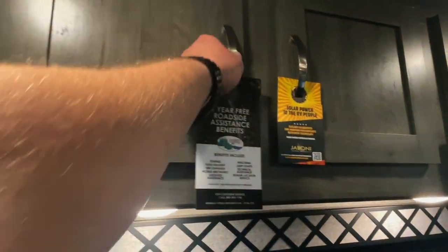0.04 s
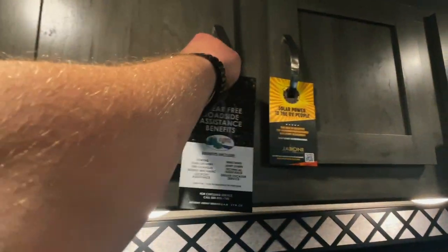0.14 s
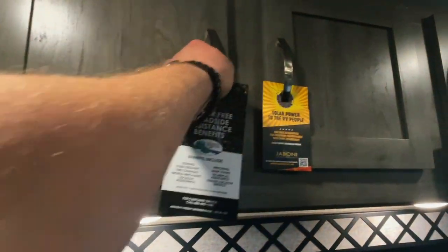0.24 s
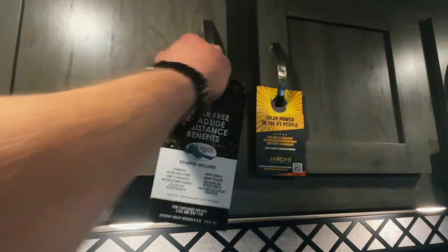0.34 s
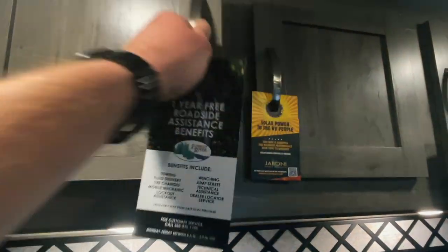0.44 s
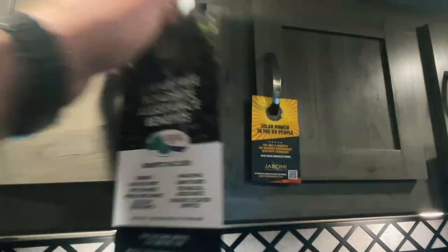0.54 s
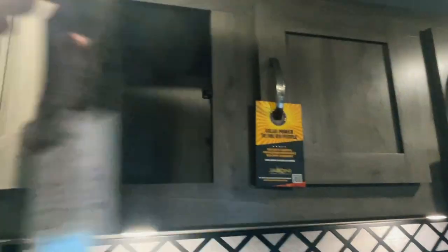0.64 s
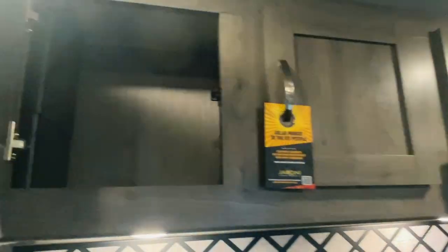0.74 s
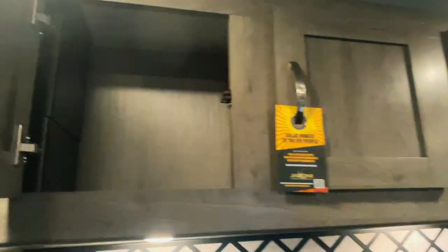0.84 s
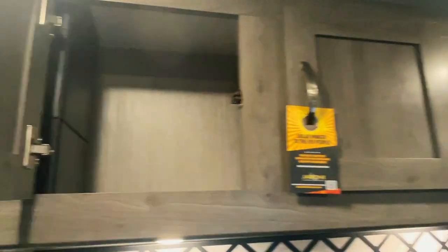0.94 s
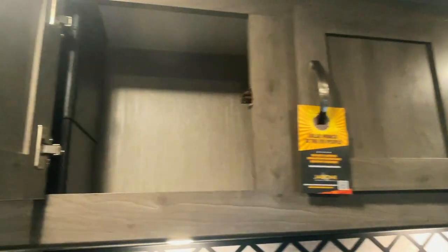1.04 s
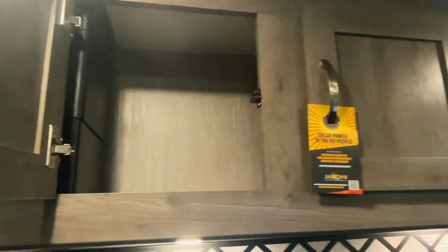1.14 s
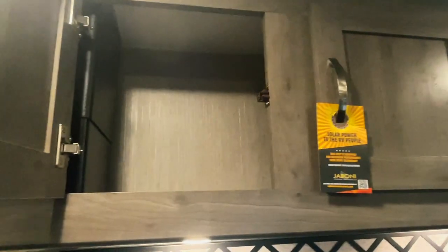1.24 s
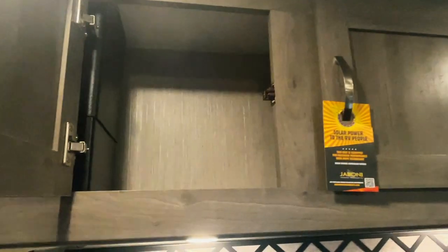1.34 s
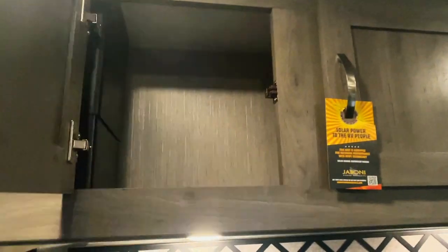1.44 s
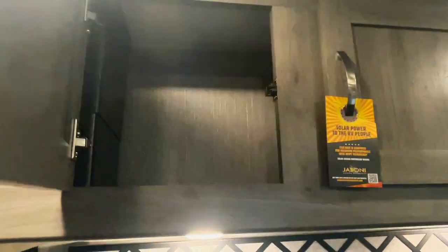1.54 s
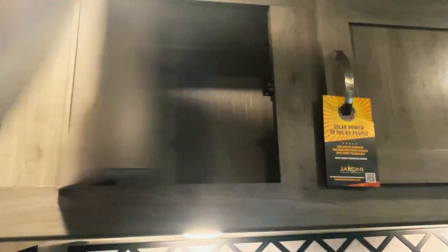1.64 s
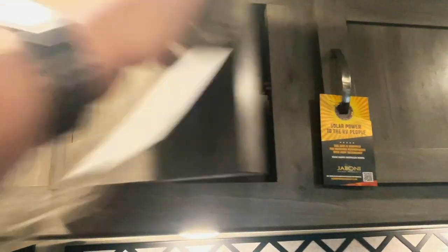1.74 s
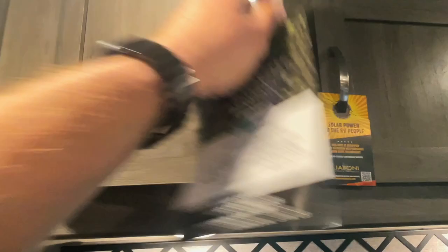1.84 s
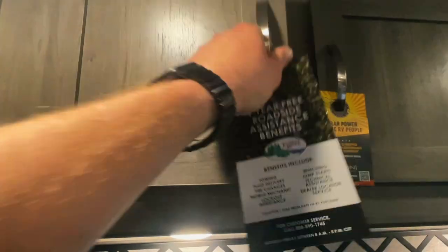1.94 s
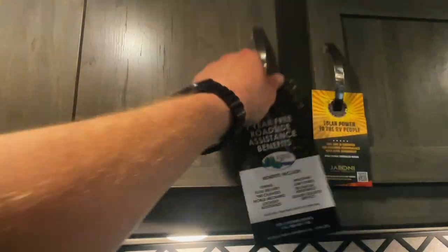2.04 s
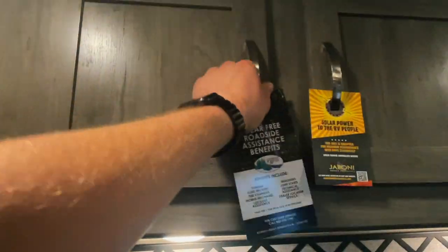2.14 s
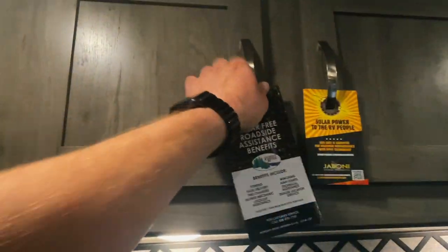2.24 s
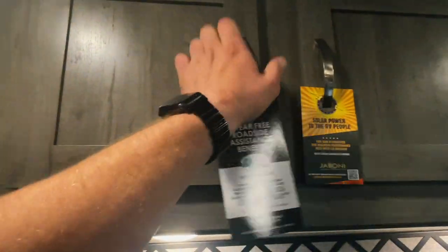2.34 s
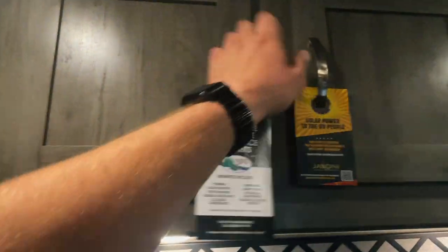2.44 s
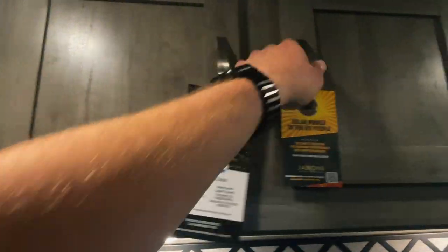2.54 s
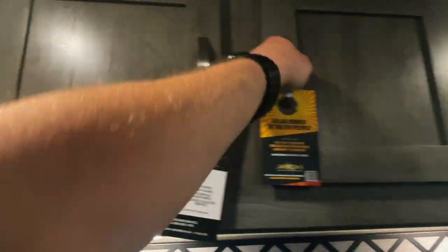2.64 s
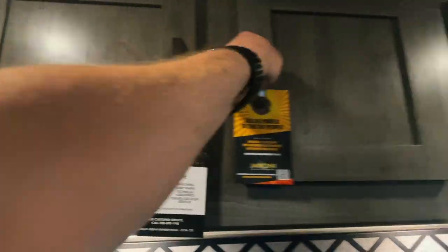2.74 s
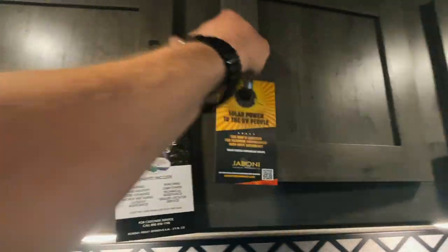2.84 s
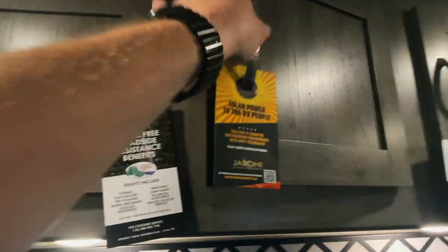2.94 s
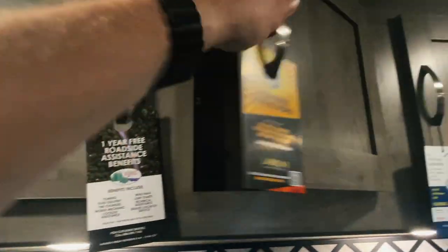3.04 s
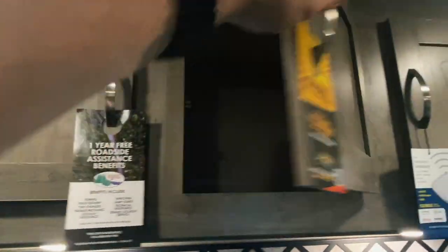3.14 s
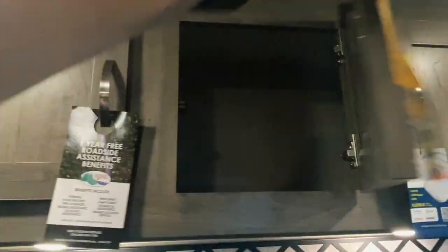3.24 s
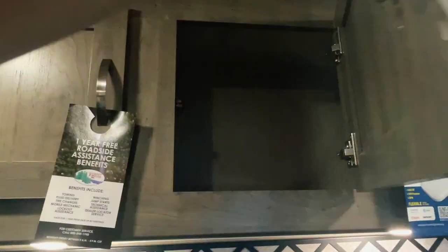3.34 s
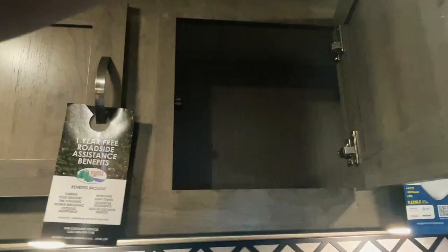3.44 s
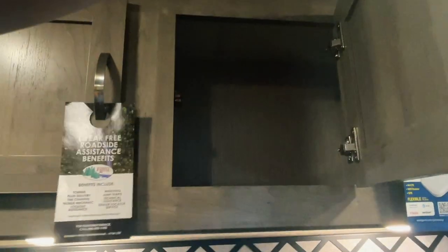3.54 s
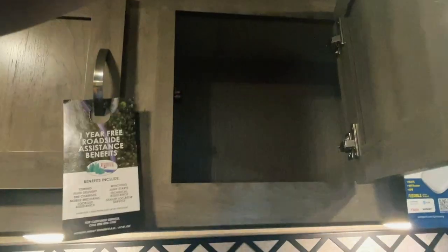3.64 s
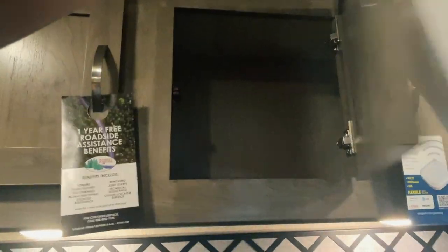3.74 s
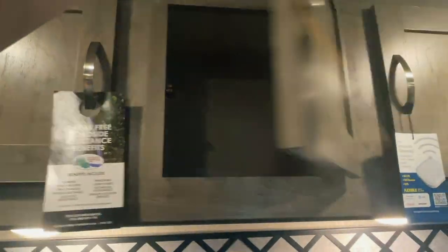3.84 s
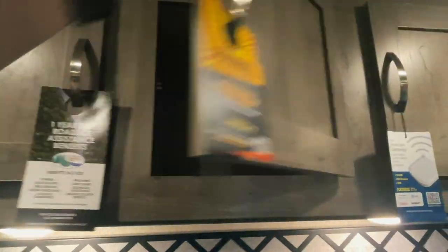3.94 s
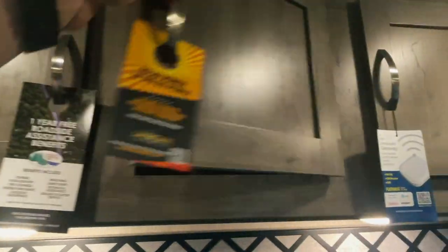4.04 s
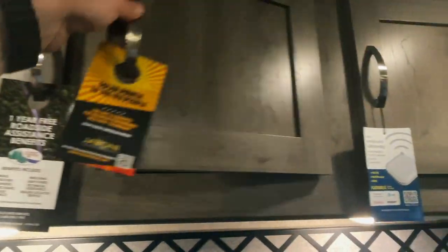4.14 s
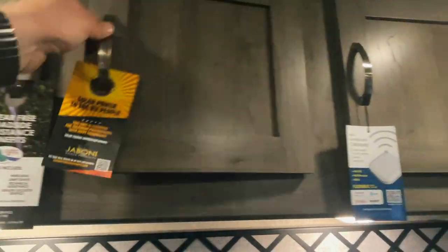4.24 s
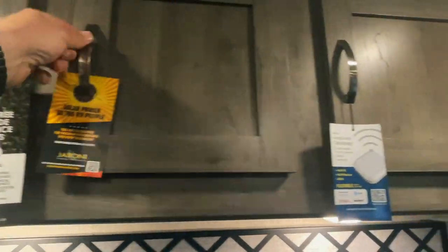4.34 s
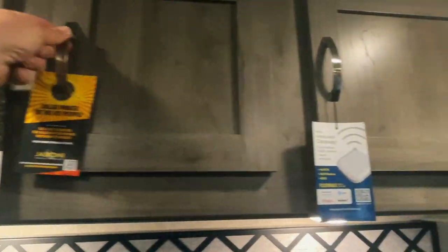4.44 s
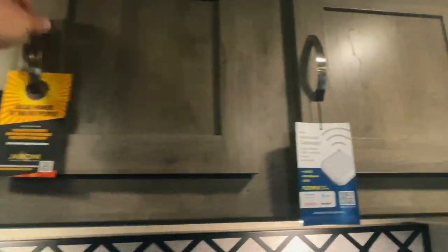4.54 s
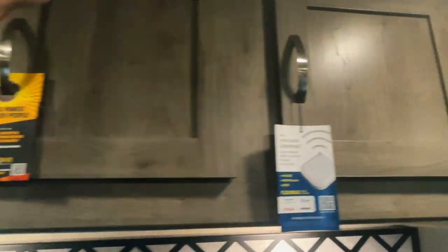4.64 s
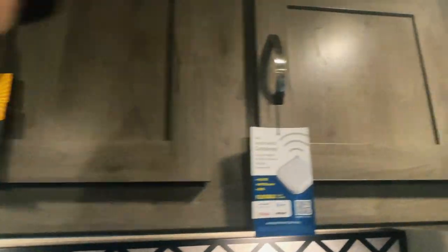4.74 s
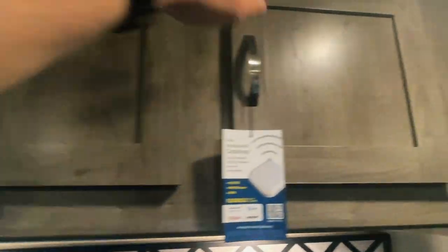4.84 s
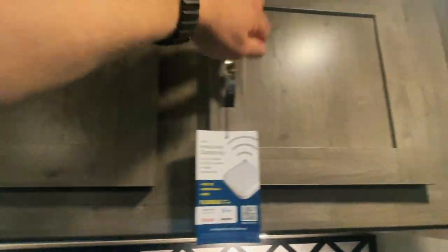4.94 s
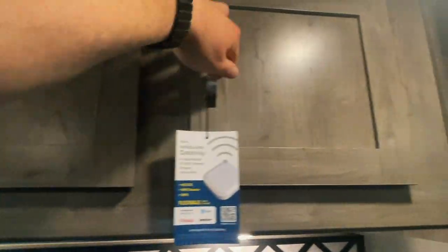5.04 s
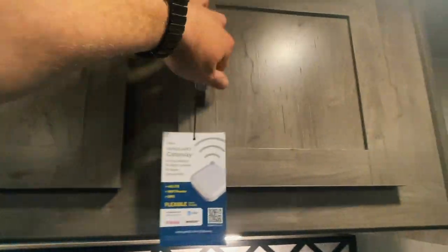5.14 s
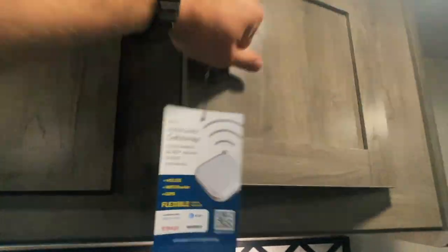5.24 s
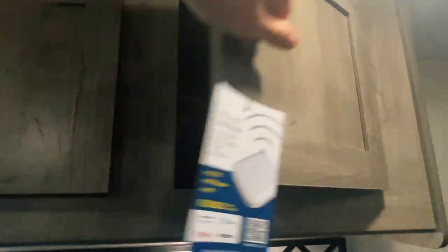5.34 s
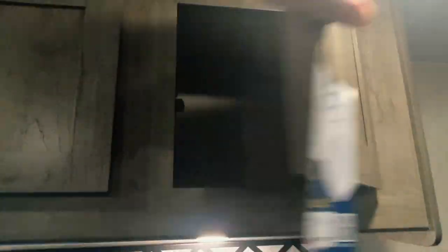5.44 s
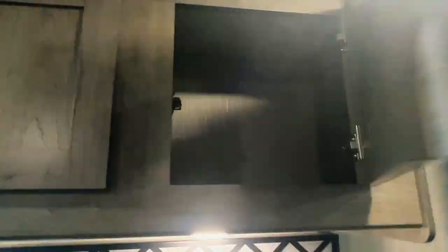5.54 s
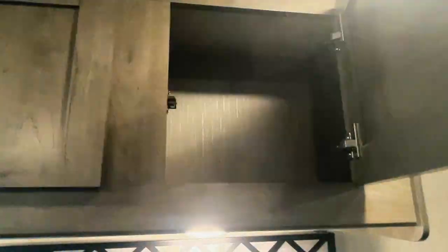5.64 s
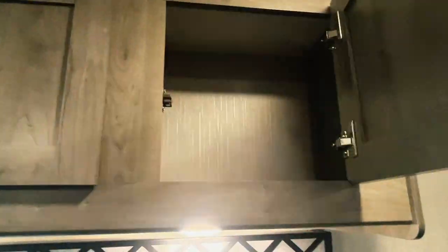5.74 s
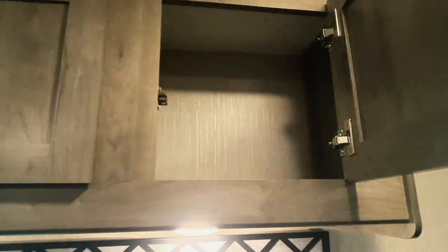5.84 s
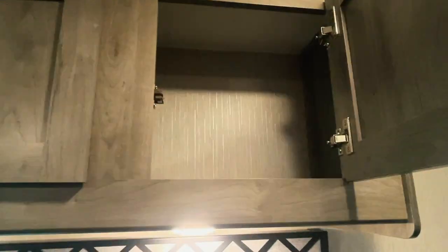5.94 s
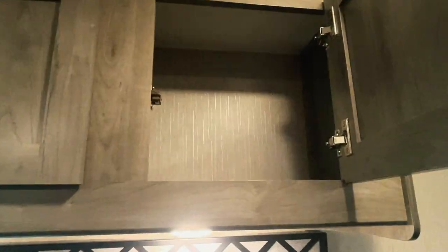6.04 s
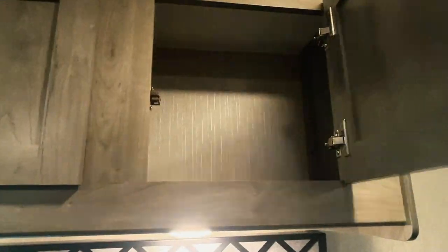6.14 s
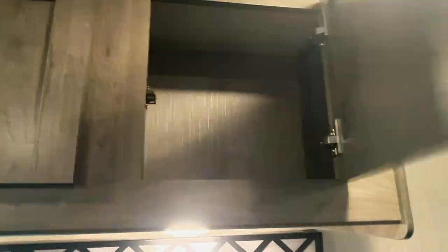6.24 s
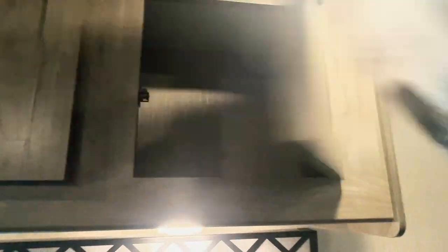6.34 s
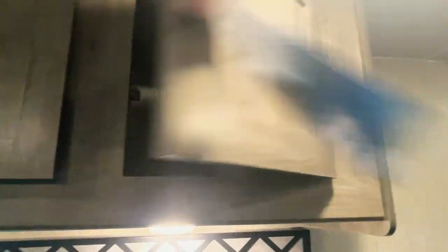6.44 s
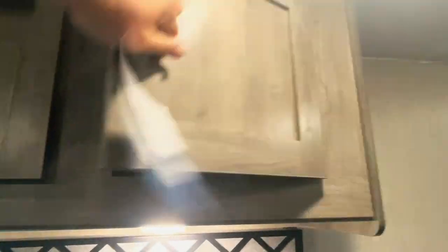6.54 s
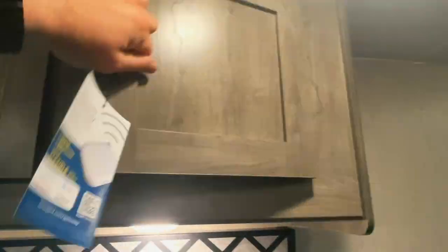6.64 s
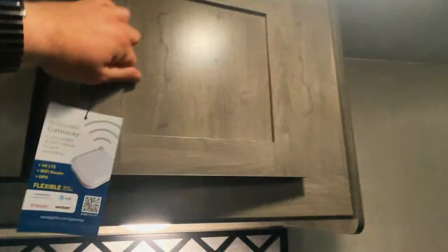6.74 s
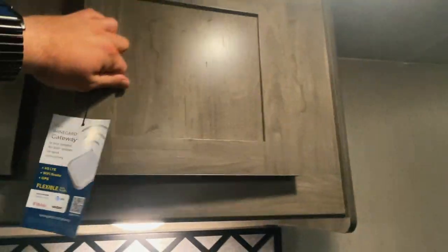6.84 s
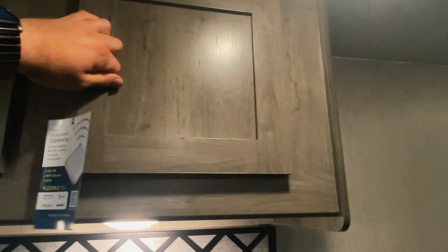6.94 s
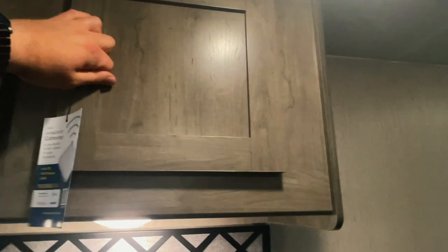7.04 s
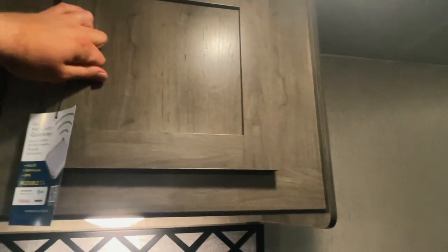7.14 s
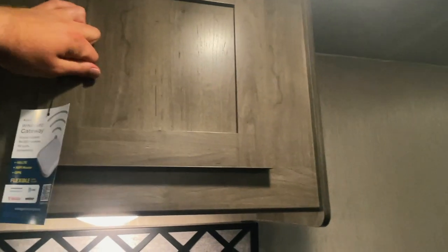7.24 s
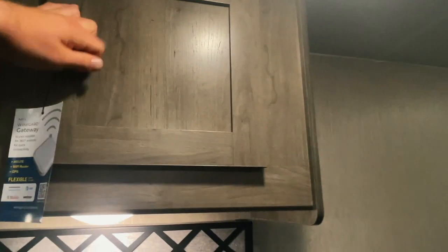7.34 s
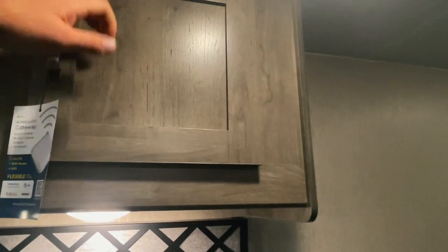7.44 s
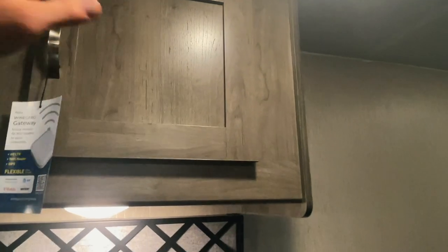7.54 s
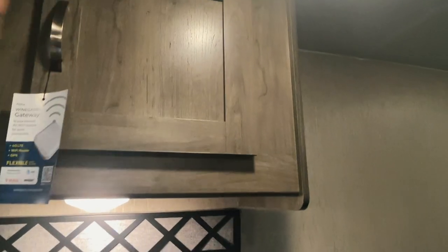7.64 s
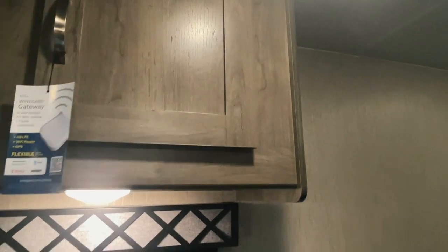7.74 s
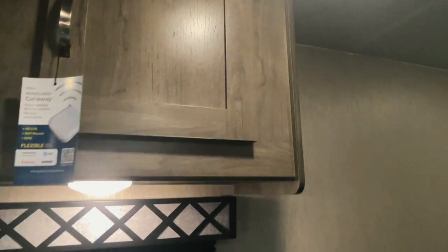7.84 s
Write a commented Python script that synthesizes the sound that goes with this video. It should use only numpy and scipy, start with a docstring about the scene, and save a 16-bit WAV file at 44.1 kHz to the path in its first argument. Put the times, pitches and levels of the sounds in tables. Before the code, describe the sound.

Close stereo recording in a small camper. A wooden cupboard door snaps off its spring catch, pauses, then claps shut. Two more doors follow the same way, each with a hollow knock and short boxy ring. Between them are soft hand bumps, card flicks, hinge ticks, light rubbing and sleeve swishes over faint low rumble.

```python
"""In a small camper, three overhead wooden cabinet doors are pulled open and pushed shut, one after another.
Opening, a door strains against its spring catch and snaps free; closing, it hits the catch and slams on the frame.
Hands bump the doors, hinges tick, cards flick and things rub: blows and clicks are ringing sines plus shaped
noise, rubs are noise through one resonance. Low rumble, still air and the swish of the arm are coloured noise."""
import sys
import numpy as np
from scipy import signal
from scipy.fft import rfft, irfft
from scipy.io import wavfile

SR = 44100
rng = np.random.default_rng(int(sys.argv[2]) if len(sys.argv) > 2 else 0)


def inscribe(sig):
    """Save sig as 16-bit PCM at rate SR to the path in sys.argv[1].

    A 1-D sig is mono; a 2-D sig holds one channel per row.
    Samples are clipped to [-1, 1] before scaling.
    """
    pcm = np.round(np.clip(np.atleast_2d(sig).T, -1, 1) * 32767)
    wavfile.write(sys.argv[1], SR, pcm.astype(np.int16))


N = 348390

# All levels in the tables are relative: the functions add their own balance.
# Background colours: rumble, stirred air, swish of sleeve and cards. Columns: f/Hz, level per Hz/dB
RUMBLE_COLOUR = [(15, -15.5), (30, -11), (55, 3.5), (80, -1.5), (130, -13.5), (200, -23), (400, -73.5)]
AIR_COLOUR = [(70, -30.5), (170, -3.5), (330, -7), (550, -10), (900, -10), (1400, -15.5), (2500, -19),
              (6000, -51.5)]
SWISH_COLOUR = [(700, -46), (1500, 2.5), (2200, -1), (3500, 3), (6000, 2.5), (8000, -6.5), (11000, -9.5),
                (16000, -55.5)]
# How loud the low rumble is over time. Columns: t/s, level/dB
RUMBLE_LEVEL = [(0, -39), (.6, -50.5), (1.1, -47), (2.3, -48.5), (2.9, -42.5), (4.4, -44), (5.8, -55),
                (6.2, -49), (7.9, -48.5)]
# Arm movements that swell and fade. Columns: t when fastest/s, half-length/s, air level/dB, swish level/dB
ARM_MOVES = [(0.033, 0.16, -43, -53.5), (0.516, 0.28, -51.5, -63), (1.293, 0.046, -60, -66.5),
             (1.94, 0.34, -48.5, -60), (2.99, 0.4, -46.5, -53), (3.528, 0.16, -46.5, -50.5),
             (3.836, 0.18, -49, -65), (4.42, 0.42, -49, -61), (5.32, 0.14, -51, -56.5),
             (6.18, 0.13, -74, -61), (7.266, 0.098, -47, -52), (7.703, 0.58, -55.5, -60)]
# Fingers and cards rub on a handle, or a hinge creaks.
# Columns: t at the middle/s, length/s, resonance f/Hz, width/Hz, level/dB
RUBS = [(0.06, 0.13, 686, 895, -46.5), (2.47, .13, 2130, 220, -52), (2.948, 0.068, 2130, 350, -49),
        (3.096, 0.12, 4900, 3030, -48), (3.306, 0.092, 2420, 4200, -46.5), (3.312, .11, 580, 500, -47),
        (3.571, 0.064, 2220, 1300, -46), (4.417, .11, 720, 505, -50), (4.662, 0.38, 1125, 110, -54.5),
        (4.678, .31, 3590, 250, -64.5), (4.861, .06, 475, 450, -41), (4.998, 0.045, 1270, 400, -31.5),
        (5.187, .03, 3480, 500, -46), (5.196, 0.056, 690, 710, -42.5), (6.634, .02, 1270, 700, -36),
        (6.775, .1, 520, 500, -31), (7.22, .08, 370, 450, -35.5)]
# A hanging card flicks against its door. Columns: t/s, level/dB
CARD_FLICKS = [(.077, -19), (.204, -5.5), (.368, -22.5), (.588, -23), (2.143, -13), (2.1827, -8.5),
               (2.907, -7), (3.779, -21), (4.095, -23), (5.528, -21)]
# A hinge or loose catch ticks as its door moves. Columns: t/s, level/dB, brightness/dB
HINGE_TICKS = [(1.5535, -21, 9.5), (1.557, -22.5, 7), (2.420, -15, -25), (2.574, -19, -17),
               (3.560, -16, -15.5), (3.941, -17.5, -1.5), (5.395, -17, -14), (6.267, -25.5, -19),
               (6.333, -31, 1.5), (6.551, -11.5, -3), (6.625, -9, -8), (6.81, -14, -8)]
# The middle door's handle rings when knocked. Columns: t/s, level/dB
HANDLE_KNOCKS = [(2.421, -40.5), (2.636, -32)]
# Notes of that handle. Columns: f/Hz, level/dB, time to fall 60 dB/s
HANDLE_NOTES = [(2000, -5, .2), (2050, 3.5, 0.23), (2120, -5.5, 0.19), (2270, -8, 0.14)]
# A hand bumps a door or its handle. Columns: t/s, door (0 left, 1 middle, 2 right), thump level/dB,
# wood level/dB, edge level/dB, build-up/s, after-ring level/dB
BUMPS = [(2.420, 1, -14, -14, -16.5, .001, 17), (2.576, 1, -23, -24, -37, .0013, -6),
         (2.820, 1, -20, -30.5, -31, 0.0033, 18), (4.829, 2, -12, -41, -32, 0.002, -14),
         (4.852, 2, -13, -17.5, -33.5, .002, 11), (6.268, 2, -32, -30.5, -36.5, 0.00051, -15),
         (6.612, 2, -22, -25.5, -39, 0.0045, -4), (7.214, 2, -11.5, -18, -48, .015, 7)]
# A door is pulled open. Columns: t when the catch lets go/s, door, pull knock level/dB, wood level/dB,
# panel f/Hz, panel swing level/dB, snap level/dB, after-ring level/dB
OPENINGS = [(.139, 0, -13, -6, 96, -14, 6.5, -2), (2.635, 1, -2, -1, 70.4, -6, 1, -1),
            (5.004, 2, -8, 2.5, 93, -4, 3, 1)]
# A door is pushed shut. Columns: t when it meets the catch/s, door, travel on to the frame/s, panel f/Hz,
# panel swing level/dB, then levels/dB of: thump on the catch, ping on the catch, thump of the slam,
# wood of the slam, edge of the slam, ping at the slam, after-ring
CLOSINGS = [(1.9349, 0, 0.026, 155.5, -2, -13, -6, 3.5, 5, -9, -35, -0.5),
            (4.154, 1, .059, 166, -7.5, 2, -6.5, 2, -2.5, 2, -4, 10),
            (6.726, 2, .112, 95.8, -6, 1, -20.5, 0.5, 5, -4, -13, 6.5)]
# Notes each door rings with, one list per door.
# Columns: f/Hz, level struck at the handle/dB, level struck at the frame/dB, time to fall 60 dB/s
DOOR_NOTES = [
    [(59.75, -17, -36, 0.87), (105.2, -25, -7, 0.28), (156.3, -13, -23, 0.3), (184, -14, -33, 0.34),
     (248, -30, -32, 0.1), (306, -24, -30.5, 0.19), (327.5, -23, -12.5, 0.22), (418.6, -19, -21.5, 0.26),
     (529.3, -18, -20.5, 0.26), (616, -34, -21, 0.3), (715, -16, -18, 0.14), (844, -11, -28, 0.19),
     (1325, -21, -13, 0.1), (1670, -12, -27, 0.1), (2120, -40, -13.5, 0.09), (2474, -24, -32, 0.13),
     (2640, -11, -16, 0.078), (3490, -21, -35, 0.17)],
    [(63.5, -37.5, -23.5, 1), (139.4, -13, -19, 0.37), (163.8, -9, -18, 0.25), (222.5, -34, -17, 0.15),
     (270, -36, -8.5, 0.07), (345.3, -9.5, -9.5, 0.16), (407.6, -12, -23, 0.23), (519, -19, -6.5, 0.085),
     (572, -28, -22, 0.47), (632.7, -19.5, -9, 0.16), (724, -23, -10, 0.054), (817, -10, -16, 0.2),
     (915, -45, -31, 0.23), (1028, -11.5, -33, 0.068), (1144, -25, -32.5, 0.23), (1356, -37, -30.5, 0.34),
     (1468, -35, -31.5, 0.2), (2020, -27, -28.5, 0.4), (2030, -23, -29.5, 0.22), (1996, -21, -34.5, 0.25),
     (2650, -32, -44, 0.43), (2625, -27.5, -34, 0.31), (2830, -18, -44.5, 0.1)],
    [(65.46, -19.5, -16, 1), (123.2, -22, -14.5, 0.49), (164.8, -21, -15.5, 0.26),
     (212.7, -22, -19.5, 0.26), (269.8, -9, -14.5, 0.15), (296, -18.5, -17, 0.12), (410, -22, -35, 0.29),
     (482, -43, -33, 0.09), (572, -20, -21, 0.29), (727, -35, -20, 0.18), (855, -40, -19, 0.22),
     (990, -14, -50, 0.11), (1217, -12, -21, 0.14), (1397, -43, -24.5, 0.25), (1630, -38, -24, 0.13),
     (1825, -19, -32, 0.17), (1800, -27.5, -39, 0.11), (2280, -33.5, -38, 0.13), (2790, -26, -38, 0.25)],
]
# Steel of catches and hinges, before any shift of pitch. Columns: f/Hz, level/dB, time to fall 60 dB/s
SPRING_NOTES = [(3050, -12.5, 0.011), (4270, 0.5, 0.008), (5040, 6, 0.0087), (5580, -10, 0.044),
                (5970, -14, 0.027)]
# Colour of the cabinet's dense ring, and of a click. Columns: f/Hz, level per Hz/dB
CABINET_COLOUR = [(25, 8), (45, 41.5), (70, 39), (130, 39), (220, 31), (400, 25.5), (750, 22.5),
                  (1000, 19.5), (1600, 20), (3200, 16), (5500, 15), (7500, 6), (11000, -2), (16000, -8.5)]
CLICK_COLOUR = [(60, -25.5), (150, -11.5), (700, 21.5), (1500, 15), (3000, 13), (5500, 10.5), (7500, 1.5),
                (11000, 2.5), (16000, 0.5)]
# How woodwork and cabin die away; a blow shortens or stretches the woodwork time by its damping factor.
# Columns: f/Hz, woodwork 60 dB fall/s, cabin 60 dB fall/s, cabin share level/dB, first crack share level/dB
DECAY = [(61, 1, 0.7, 10.5, -25), (164, 0.086, 0.63, -14.5, 9), (420, 0.12, 0.43, -13, -10),
         (1140, 0.13, 0.56, -3.5, -5.5), (3000, 0.15, 0.79, -10, 3), (6100, 0.21, 0.99, -9.5, -2.5),
         (12100, 0.15, 0.41, -6.5, 6.5)]
# The two microphone ports. Columns: f/Hz, colour level/dB, left-right likeness (0 to 1), left minus right/dB
PORTS = [(60, -0.5, 0.92, -0.5), (155, 1.5, 0.94, -1), (330, 1, 0.38, 0.5), (670, -2.5, 0.096, 2),
         (1450, -1, 0, 1.5), (3020, -1, 0, 0), (4900, -4, 0, 6), (8300, 1.5, 0.13, 1), (9380, 5, 1, 0),
         (11160, 7.5, 1, 0.5), (12800, -7, 0.2, -2), (13600, -30.5, .8, 0), (15600, -19.5, .7, 3.5)]
# The ports resonate apart, so their phase slips in the treble. Columns: f/Hz, phase/rad
PORT_SLIP = [(8000, 0), (9000, .9), (9700, 2.4), (10250, 3.14), (11800, 6.2), (15000, 12.5)]

STILL_AIR_DB, STILL_HISS_DB = -54.5, -68  # relative levels with nothing moving (dB)
RUSTLE_FLUTTER_DB = 1.6  # depth of the flutter in each band of the swish (dB)
LEAD_S = 0.03  # room for the swell before each contact (s)
STRAIN_S = 0.017  # the pull loads the catch this long before it lets go (s)
BRISK_S = 0.028  # reference travel: a slower door clicks more softly, a faster one louder (s)
YIELD_SHARE = 0.09  # the spring yields for this share of the travel before the panel feels it
RAMP_S = 0.007  # the catch scrapes over its ramp this long before the slam (s)
PANEL_HZ = 71.5  # a panel's own slow swing after a slam or a bump (Hz)
EDGE_HZ = 15900  # upper band limit (Hz)
CEILING = 0.75  # rounded-off peaks stay below this (full scale is 1)
RING_T = np.arange(SR) / SR  # time axis of one knock (s)


def gain_of(db):
    """Turns decibels into a gain."""
    return 10 ** (np.asarray(db) / 20)


def read(points, hz, axis=1):
    """Reads one table column, joined by straight lines over log frequency."""
    table = np.array(points, float)
    return np.interp(np.log(hz + 1), np.log(table[:, 0] + 1), table[:, axis])


def add(mix, s, sound):
    """Mixes a stereo sound in at time s."""
    part = mix[:, max(round(s * SR), 0):]
    part[:, :sound.shape[1]] += sound[:, :part.shape[1]]


def pair(size):
    """Spectra of white noise at the two ports, as alike in each pitch range as the table says."""
    hz = np.fft.rfftfreq(size, 1 / SR)
    left, other = rfft(rng.standard_normal((2, size)))
    same = np.clip(read(PORTS, hz, axis=2), -1, 1)
    right = same * left + np.sqrt(1 - same ** 2) * other
    return hz, np.array([left, right])


def wander(count):
    """Slow random curve: straight lines between count random points a second."""
    knots = rng.standard_normal(int(count * N / SR) + 2)
    return np.interp(np.arange(N) * count / SR, np.arange(len(knots)), knots)


def bed(colour, level_db, flutter_db):
    """Coloured noise that follows a level and flutters a little."""
    hz, noise = pair(N)
    sound = irfft(noise * gain_of(read(colour, hz)), N)
    return sound / sound.std() * gain_of(level_db + flutter_db * wander(count=30))


def rustle(level_db, count):
    """The swish of sleeve and cards: each of its overlapping bands flutters on its own."""
    hz, noise = pair(N)
    noise = noise * gain_of(read(SWISH_COLOUR, hz))
    centres = np.geomspace(1500, 11000, count)
    out = np.zeros((2, N))
    for pick in np.eye(count):
        band = irfft(noise * read(np.c_[centres, pick], hz), N)
        out += band * gain_of(RUSTLE_FLUTTER_DB * wander(count=16))
    return out / out.std() * gain_of(level_db + 0.8 * wander(count=9))


def background():
    """Low rumble and the still cabin; each movement of the arm stirs the air and swishes."""
    t = np.arange(N) / SR
    air_power, swish_power = gain_of(STILL_AIR_DB) ** 2, gain_of(STILL_HISS_DB) ** 2
    for s, half_length, air_db, swish_db in ARM_MOVES:
        swell = np.exp(-((t - s) / half_length) ** 2)
        air_power = air_power + gain_of(air_db) ** 2 * swell
        swish_power = swish_power + gain_of(swish_db) ** 2 * swell
    rumble_db = np.interp(t, *np.transpose(RUMBLE_LEVEL))
    rumble = bed(RUMBLE_COLOUR, rumble_db + 1.5, flutter_db=0.9)
    air = bed(AIR_COLOUR, 10 * np.log10(air_power), flutter_db=2.1)
    return rumble + air + rustle(10 * np.log10(swish_power) + 2.6, count=6)


def rubs():
    """Friction feeds one resonance, swelling and fading with the stroke."""
    out = np.zeros((2, N))
    for s, length, centre_hz, width_hz, db in RUBS:
        hz, noise = pair(SR)
        sound = irfft(noise / (1 + (2 * (hz - centre_hz) / width_hz) ** 2), SR)
        stroke = np.hanning(int(length * SR))
        stroke = stroke * gain_of(1.6 * wander(count=140)[:len(stroke)])  # the surfaces catch and slip
        rub = stroke * sound[:, :len(stroke)] / sound.std()
        add(out, s - length / 2, gain_of(db + 3.5) * rub)
    return out


def uneven(hz, depth_db, width_hz):
    """Clusters of close resonances lift some narrow bands and leave others hollow."""
    lifts = rng.standard_normal(size=512)
    grid = np.arange(len(lifts)) * width_hz
    gain = gain_of(depth_db * np.interp(hz, grid, lifts) / (1 + hz / 6000))
    return gain / np.sqrt(np.mean(gain[hz < 3000] ** 2))


def burst(t60, rise):
    """Power curve of unit energy: swells up to the moment of contact, then dies away."""
    t = RING_T - LEAD_S
    swell = 2 * t / max(rise, 1e-4)
    decay = -np.log(1e6) * t / max(t60, 1e-3)
    power = np.exp(np.where(t < 0, swell, decay))
    power *= np.minimum(RING_T / LEAD_S, 1) ** 4  # the swell grows out of silence
    return power / power.sum()


def rattle(colour_db, build_up, crack_db, crack_t60, cabin_db, damping):
    """Countless close resonances struck at once: a crack, the woodwork, then the cabin, band by band."""
    hz, noise = pair(SR)
    noise = noise * gain_of(colour_db(hz)) * uneven(hz, depth_db=4.0, width_hz=55)
    centres = [row[0] for row in DECAY]
    out = np.zeros((2, SR))
    for (centre, wood_t60, cabin_t60, tail_db, first_db), pick in zip(DECAY, np.eye(len(DECAY))):
        band = irfft(noise * read(np.c_[centres, pick], hz), SR)
        crack, tail = gain_of(first_db + crack_db) ** 2, gain_of(tail_db + cabin_db) ** 2
        rise = build_up + 0.69 / centre  # low notes take longer to build and peak later
        power = crack * burst(crack_t60, rise)
        power = power + burst(wood_t60 * damping, rise)
        power = power + tail * burst(cabin_t60, rise)
        power = np.interp(RING_T - 0.68 / centre, RING_T, power, left=0)
        out += band * np.sqrt(power / (1 + crack + tail))
    return out


def ring(modes, rise):
    """Dying sines; the less alike the ports are at a pitch, the further out of step they hear it."""
    out = np.zeros((2, SR))
    for (hz, db, t60), chance in zip(modes, rng.uniform(-0.47, 1, (len(modes), 2))):
        t = RING_T[:int(np.clip(t60, 0.01, 0.7) * 1.3 * SR)]
        apart = np.pi * chance[:, None] * np.clip(1 - read(PORTS, hz, axis=2), 0, 1)
        level = gain_of(db - 60 * t / t60) * (1 - np.exp(-t / rise))
        out[:, :len(t)] += level * np.sin(2 * np.pi * hz * t + apart)
    return out


def click(body_db, treble_db, spring_db, pitch=1):
    """A small hard contact LEAD_S in: a short crack, the ping of a spring and faint echoes."""
    def colour(hz):
        return read(CLICK_COLOUR, hz) + read([(3000, body_db), (9000, treble_db)], hz)

    direct = rattle(colour, build_up=0.0009, crack_db=-0.5, crack_t60=0.0074, cabin_db=3.5, damping=1.0)
    notes = [(hz * pitch, db, t60) for hz, db, t60 in SPRING_NOTES]
    add(direct, LEAD_S, gain_of(spring_db) * ring(notes, rise=0.0002))
    out = direct.copy()
    for delay, db in [(0.0017, -18), (0.0068, -19)]:  # off the door frame and the ceiling
        add(out, delay, gain_of(db) * direct)
    return gain_of(-3.5) * out


def ticks():
    """Steel hinges ping more the brighter they tick; cards give a thin, high flick."""
    out = np.zeros((2, N))
    for s, db, bright_db in HINGE_TICKS:
        ping_db = db + 1.34 * bright_db - 15.5
        add(out, s - LEAD_S, click(body_db=db, treble_db=db + bright_db, spring_db=ping_db, pitch=1.1))
    for s, db in CARD_FLICKS:
        add(out, s - LEAD_S, click(body_db=db - 15.5, treble_db=db, spring_db=db - 43))
    return out


def handle():
    """A metal handle rings briefly under the fingers."""
    out = np.zeros((2, N))
    for s, db in HANDLE_KNOCKS:
        add(out, s, gain_of(db) * ring(HANDLE_NOTES, rise=0.001))
    return out


def chatter(depth_db, lasts):
    """Loose hinges and catches buzz unevenly around a blow: a fast random gain that settles."""
    knots = np.linspace(0, 1, 350)
    jitter = np.interp(RING_T, knots, rng.standard_normal(len(knots)))
    return gain_of(depth_db * np.exp(-abs(RING_T - LEAD_S) / lasts) * jitter)


def blow(door, at_frame, panel_hz, swing_db, thump_db, wood_db, edge_db, build_up, after_db, reach_hz=900):
    """A blow LEAD_S in swings the panel, rings that door's notes and rattles the whole cabinet."""
    # a hard contact reaches higher in pitch
    force = [(120, thump_db), (300, wood_db), (reach_hz, wood_db), (4000, edge_db)]
    modes = []
    for hz, handle_db, frame_db, t60 in DOOR_NOTES[door]:
        struck_db = frame_db if at_frame else handle_db
        modes.append((hz, struck_db + read(force, hz), t60))

    def colour(hz):
        return read(CABINET_COLOUR, hz) + read(force, hz)

    out = rattle(colour, build_up, crack_db=-4.0, crack_t60=0.044, cabin_db=after_db - 0.5, damping=2.34)
    out = out * chatter(depth_db=3.5, lasts=0.027)
    add(out, LEAD_S, gain_of(-4.0) * ring(modes, rise=0.001 + 0.26 * build_up))
    add(out, LEAD_S + 0.0022, ring([(panel_hz, swing_db, 22 / panel_hz)], rise=0.0092))
    return out


def bumps():
    """Soft blows of the hand, dull above the lowest notes of the wood; the panel swing follows the thump."""
    out = np.zeros((2, N))
    for s, door, thump_db, wood_db, edge_db, build_up, after_db in BUMPS:
        add(out, s - LEAD_S, blow(door, False, PANEL_HZ, thump_db - 9.5, thump_db, wood_db, edge_db,
                                  build_up, after_db, reach_hz=390))
    return out


def openings():
    """The pull takes up the slack with a small knock, then the catch snaps free and the panel springs out."""
    out = np.zeros((2, N))
    for s, door, pull_db, wood_db, panel_hz, swing_db, snap_db, after_db in OPENINGS:
        free = s - LEAD_S
        pull = free - STRAIN_S
        add(out, pull, blow(door, False, panel_hz=161.3, swing_db=-20, thump_db=pull_db - 8.5,
                            wood_db=pull_db - 9, edge_db=pull_db - 7, build_up=0.0029, after_db=-11.5))
        add(out, pull, click(body_db=pull_db - 8, treble_db=pull_db - 11.0, spring_db=-48))
        add(out, free, blow(door, False, panel_hz, swing_db, thump_db=-9, wood_db=wood_db,
                            edge_db=wood_db - 3.5, build_up=0.0099, after_db=after_db))
        add(out, free, click(body_db=snap_db - 6, treble_db=wood_db * 0.79 + 7.5, spring_db=-42))
    return out


def closings():
    """The door clicks on the catch, thumps as the spring loads, scrapes over the ramp and slams on the frame."""
    out = np.zeros((2, N))
    for (s, door, travel, panel_hz, swing_db, thump_db, catch_ping_db,
         slam_thump_db, wood_db, edge_db, slam_ping_db, after_db) in CLOSINGS:
        meet = s - LEAD_S
        slam = meet + travel
        speed_db = 20 * np.log10(BRISK_S / travel)
        add(out, meet, click(body_db=6.0 + 1.15 * speed_db, treble_db=1.1 * speed_db + 3.1,
                             spring_db=catch_ping_db))
        add(out, meet + YIELD_SHARE * travel,
            blow(door, True, panel_hz, swing_db, thump_db, wood_db=0.28 * speed_db - 3.0,
                 edge_db=edge_db - 7.5, build_up=0.00087, after_db=after_db + 2.0))
        add(out, slam - RAMP_S, click(body_db=edge_db - 6.5, treble_db=edge_db - 9, spring_db=-40))
        add(out, slam, blow(door, True, PANEL_HZ, swing_db=-13.5, thump_db=slam_thump_db, wood_db=wood_db,
                            edge_db=edge_db, build_up=0.06 * travel, after_db=after_db))
        add(out, slam - 0.0012, click(body_db=edge_db + 8.5, treble_db=wood_db + 0.6, spring_db=slam_ping_db))
    return out


def scene():
    """The background with rubs, ticks and bumps, and the doors opening and closing on top."""
    return background() + rubs() + ticks() + handle() + bumps() + openings() + closings()


def record(dry):
    """The ports colour the sound and tilt it left or right by pitch; loud peaks are rounded; then a band limit."""
    hz = np.fft.rfftfreq(N, 1 / SR)
    lean_db = read(PORTS, hz, axis=3) / 2
    left = gain_of(lean_db)
    right = gain_of(-lean_db) * np.exp(1j * read(PORT_SLIP, hz))
    heard = irfft(rfft(dry) * np.array([left, right]) * gain_of(read(PORTS, hz)), N)
    rounded = heard / (1 + (heard / CEILING) ** 4) ** (1 / 4)
    band_limit = signal.firwin(511, EDGE_HZ, window=("kaiser", 9), fs=SR)
    return signal.oaconvolve(rounded, band_limit[None], "same")


dry = scene()
out = record(dry)
inscribe(out)
```